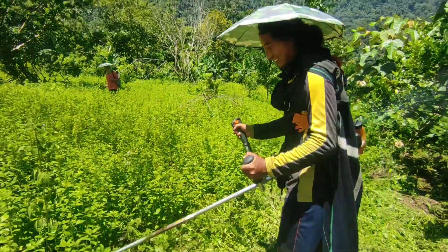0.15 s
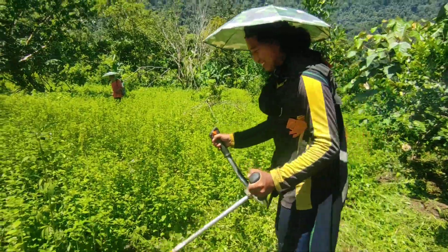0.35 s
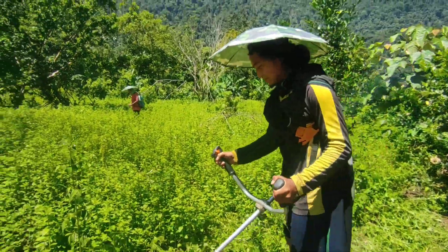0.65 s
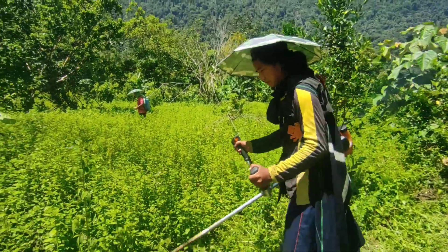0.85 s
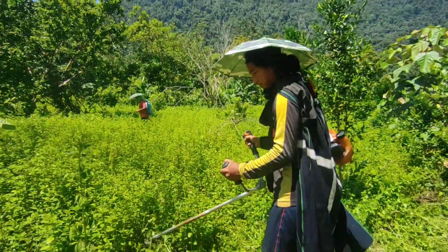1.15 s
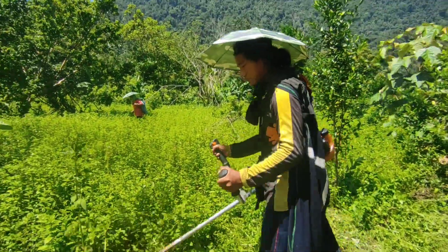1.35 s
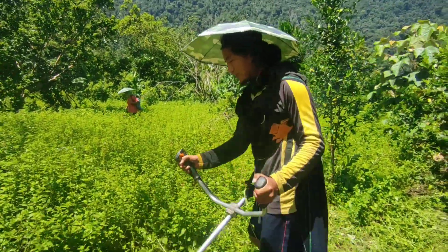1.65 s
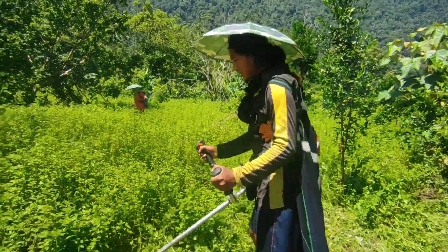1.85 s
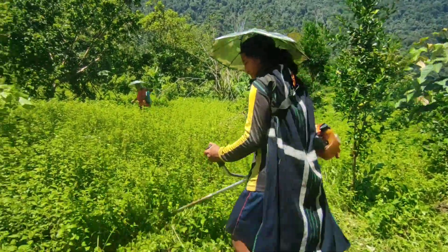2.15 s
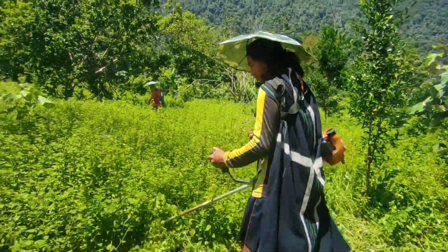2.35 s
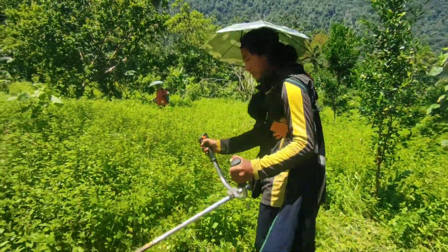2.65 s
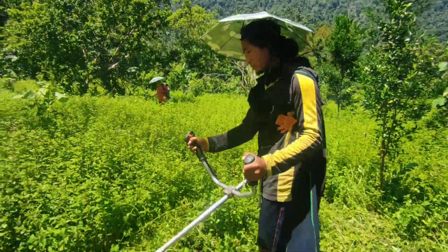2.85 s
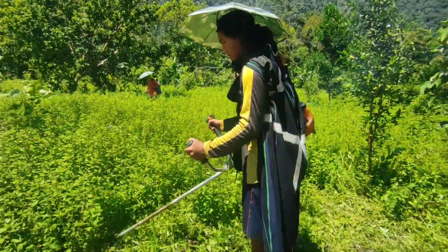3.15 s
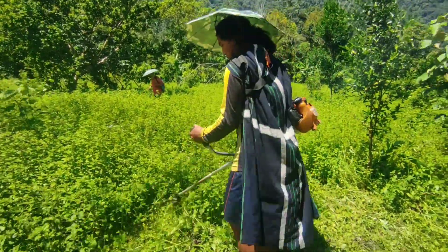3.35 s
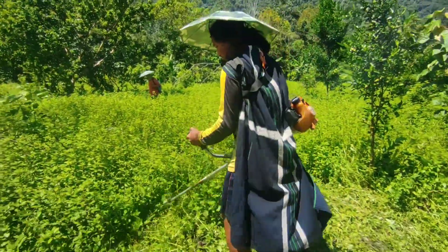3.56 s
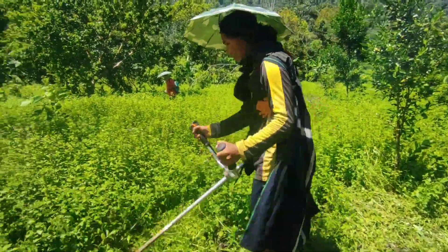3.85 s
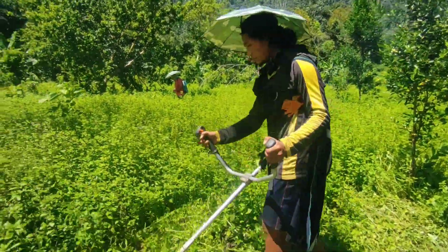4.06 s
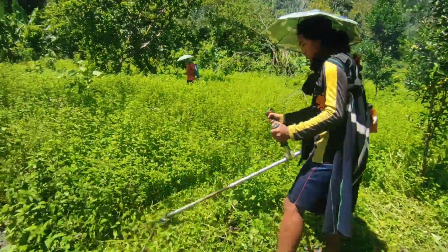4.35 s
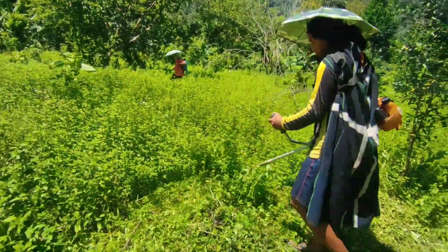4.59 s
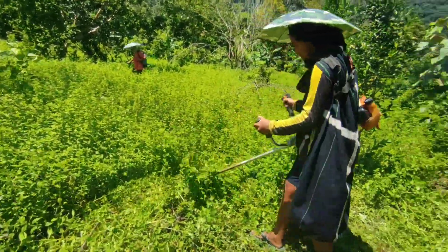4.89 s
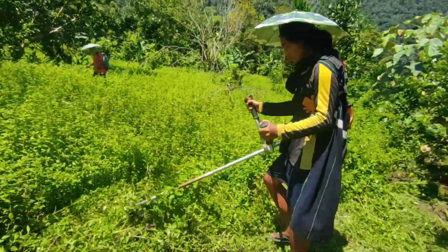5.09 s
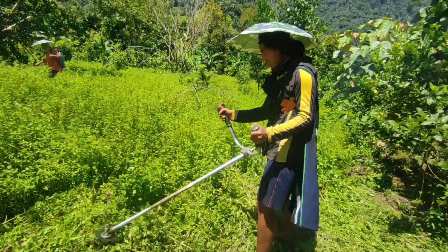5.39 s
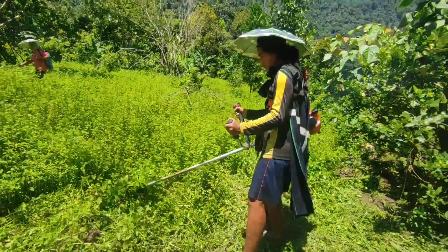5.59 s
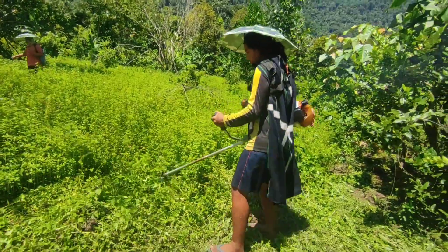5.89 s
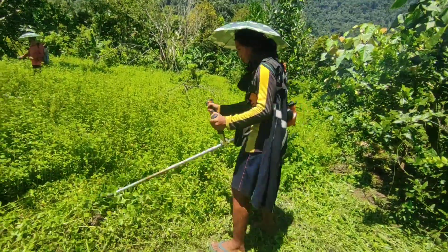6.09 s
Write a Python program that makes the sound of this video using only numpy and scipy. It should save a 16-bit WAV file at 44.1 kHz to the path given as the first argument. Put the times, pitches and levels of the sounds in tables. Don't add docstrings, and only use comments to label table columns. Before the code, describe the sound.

Steady high-revving petrol trimmer outdoors, a buzzing, fluttering drone that swells as it swings, with bright leafy hiss and short gusts on the microphone.

```python
import sys
import numpy as np
from scipy import signal
from scipy.fft import rfft, irfft, next_fast_len
from scipy.io import wavfile
from scipy.ndimage import uniform_filter1d

SR = 44100
rng = np.random.default_rng(int(sys.argv[2]) if len(sys.argv) > 2 else 0)


def output_pcm(signal):
    pcm = np.clip(np.atleast_2d(signal).T, -1, 1) * 32767
    wavfile.write(sys.argv[1], SR, np.round(pcm).astype(np.int16))


def field_ratio(decibels):
    return 10 ** (np.asarray(decibels, dtype=float) / 20)


N = 274743

# (multiple of firing rate [1], level at mean facing [dB], share of swing [dB/dB],
# share of shading [dB/dB], share lost in a cut firing [0-1], left-right spread [dB/dB])
EXHAUST_ORDERS = [(1, -30, 1.37, 0.99, 0.28, 2.4), (2, -19.5, 1.2, -0.15, 0.78, 1.2),
                  (3, -18, 0.94, 0.96, 0.16, 1.95), (4, -18, 1.23, 0.083, 0.03, 2.1),
                  (5, -22, 0.59, 0.25, 0.78, 1.1), (6, -19, 0.54, -0.27, 0.52, 0.86),
                  (7, -22.5, 0.59, 0.64, 0.84, 0.42), (8, -41, 0.28, 0.06, 1, .9)]
SILENCER_DELAY_TURNS = [.3, 0, 0, .064, .15, .2175, .257, .286]
SPARK_RETARD = [(-5, 0.014), (-2.5, 0.12), (-1.05, 0.35), (-1.22, 0.33), (2, 0.012), (3.5, 0)]
# (run start [s], time between cuts [s])
CUT_RUNS = [(0.044, 0.035), (.229, .024), (0.3, 0.04), (0.411, 0.026), (0.669, 0.031), (1.183, 0.028),
            (1.307, 0.034), (1.525, 0.027), (1.633, 0.03), (1.803, 0.032), (1.945, 0.025), (2.162, 0.037),
            (2.224, 0.026), (2.296, .0365), (2.543, .033), (2.778, .029), (2.893, 0.04), (3.159, .034),
            (3.288, .0222), (3.49, 0.032), (3.728, 0.024), (4.011, 0.028), (4.42, .036), (4.565, 0.024),
            (4.761, 0.037), (4.871, 0.032), (5.161, 0.04), (5.532, 0.034), (5.793, .0375), (6.161, 0.025)]
# (middle [s], half length [s], sag [Hz])
BITES = [(0.0, .04, 16), (.5, 0.059, 1.9), (1.02, 0.051, 7.8), (1.56, 0.065, 2.85), (1.72, 0.049, 2.22),
         (2.1, 0.071, 2.74), (2.65, 0.084, 2.92), (3.05, 0.046, 2.39), (3.33, 0.088, 2.94),
         (4.0, .12, 4.08), (4.42, 0.049, 2), (5.57, 0.041, 4.1), (6.22, 0.092, 2.9)]
# (time [s], facing level [dB], body shading of low odd orders [dB],
# ground echo cancelling order 4 [dB])
SWING = [(0.0, -22, -8, -14), (0.31, -18.5, -2, -23), (0.55, -20, -4.5, -23), (0.9, -20.5, -5.5, -17),
         (1.35, -17, -3.5, -15.5), (1.75, -20.5, -6, -16), (2.05, -19, -4, -11), (2.36, -15.5, -2.5, -21),
         (2.85, -20.5, -6, -24), (3.2, -20, -4, -14), (3.57, -15, -3, -16), (3.8, -16, -2, -15),
         (4.1, -21.5, -7, -27), (4.4, -20, -9.5, -19), (4.82, -15.5, -2.5, -23), (5.45, -20.5, -11, -13),
         (6.04, -14.5, -9, -10), (6.23, -20.5, -10.5, -12)]
# (centre [Hz], width [Hz], share removed [1])
SILENCER_HOLLOWS = [(561, 90, 1.1), (822, 80, 1.1)]
# (frequency [Hz], level [dB])
SHAFT_TONES = [
    (184, -58),
    (368, -41.5),
]
# (frequency [Hz], density [dB/Hz])
CASING_SPECTRUM = [(150, -30), (290, -17.5), (400, -7.5), (560, -21), (810, -16), (1000, -5.5), (1300, 3.5),
                   (1700, -3), (2200, -5.5), (3000, -3), (3600, -4.5), (4100, -2), (4700, -12), (5500, -65)]
SHROUD_SPECTRUM = [(3800, -11.5), (4600, -6), (5500, -3.5), (6500, -6), (7200, -1.5), (8000, -14)]
WEEDS_SPECTRUM = [(6000, -4), (7000, -9), (7800, 0), (8800, -0.5), (10000, -6)]
FAN_SPECTRUM = [(7500, -13), (8800, -3), (9800, 3), (10600, -1), (11500, 3), (12500, -1.5), (13400, -9),
                (14400, -13), (15500, -26)]
# (frequency [Hz], correlation [-1 to 1])
STEREO_LIKENESS = [(150, 1), (400, 1), (1300, -0.4), (2200, 0.14), (3200, -0.41), (6000, 0.19),
                   (14000, -0.07)]
# (frequency [Hz], left over right [dB])
STEREO_TILT = [(60, 3.0), (110, -3), (200, 27), (370, -0.5), (690, 40), (1260, -3.5), (2320, 1), (4270, 2),
               (7850, -4), (14400, 3.5)]
# (centre [Hz], width [Hz], level [dB])
BLADE_RINGS = [(7700, 100, -16.5), (9630, 290, -22), (10090, 200, -12), (11670, 290, -9.5)]
# (time [s], level [dB])
CUTTING_LOAD = [(0.0, -16), (0.3, -20), (0.62, -17), (1.46, -19.5), (1.96, -17), (2.05, -19.5),
                (2.15, -16.5), (2.3, -24.5), (2.51, -18.5), (3.1, -18.5), (3.65, -20), (3.9, -18.5),
                (4.22, -18), (4.44, -19), (4.75, -21.5), (5.15, -19), (5.75, -19), (5.9, -19.5)]
# (middle [s], half length [s], loss [dB])
SHROUD_DIPS = [(.35, .12, 2.5), (1.3, 0.12, 1.5), (2.17, 0.051, 6), (2.51, 0.073, 4.5), (3.42, 0.082, 20),
               (3.7, 0.093, 21), (4.44, .05, 8), (5.19, .03, 8), (5.94, .12, 21)]
# (middle [s], half length [s], level [dB])
WIND_PUFFS = [(.97, 0.033, -30), (1.917, 0.038, -45), (2.2, 0.034, -36), (2.691, 0.069, -39),
              (3.054, 0.037, -28), (3.15, 0.028, -41), (3.25, .04, -39), (3.48, .09, -35),
              (3.68, 0.092, -46), (3.903, 0.068, -32), (4.118, 0.038, -27), (4.426, 0.036, -50),
              (5.17, 0.078, -39), (5.56, 0.066, -38)]
# (start [s], end [s], strength [0-1])
HARD_GUSTS = [(0.953, 1.002, 0.61), (2.617, 2.656, 0.73), (2.996, 3.088, 1), (3.886, 3.911, 0.69),
              (3.93, 4.029, 0.35), (4.1, 4.128, 0.82), (5.5, 5.535, 0.48)]
# (frequency [Hz], limit re mean band power [dB])
GUARD_LIMIT = [(1800, -24), (2600, -6.5), (3500, -1), (5200, -1), (6500, -2), (7800, -9), (9000, -15),
               (12300, -13), (13400, -4.5), (14300, 2), (15500, 6.5)]


def rms_one(x):
    return x / np.sqrt(np.mean(x ** 2) + 1e-20)


def in_time(rows):
    time_s, *columns = np.transpose(rows)
    return [np.interp(np.arange(N) / SR, time_s, column) for column in columns]


def at_hz(points, hz):
    point_hz, value = np.transpose(points)
    return np.interp(np.log(hz), np.log(point_hz), value)


def bumps(rows, order=2):
    t = np.arange(N) / SR
    return sum(height * np.exp(-((t - middle) / half) ** order) for middle, half, height in rows)


def drift(rate_hz):
    r = np.exp(-80 * np.pi * rate_hz / SR)
    white = rng.standard_normal(N // 40 + 2002)
    slow = signal.lfilter([1], [1, -2 * r, r * r], white)[2000:]
    return np.interp(np.arange(N) / 40, np.arange(len(slow)), rms_one(slow))


def cut_times():
    ends = [start for start, _ in CUT_RUNS[1:]] + [N / SR]
    runs = [np.arange(start, end - 3 * step / 4, step) for (start, step), end in zip(CUT_RUNS, ends)]
    return np.concatenate(runs)


def at_cuts(shape, sizes):
    turns = np.arange(-1200, 1201) * 228 / SR
    cuts = (cut_times() * SR).astype(int)
    marks = np.zeros(N)
    marks[cuts] = sizes[:len(cuts)]
    return signal.oaconvolve(marks, shape(turns), "same")


def exhaust(gap, retard):
    sag_hz = bumps(BITES)
    firing_hz = 228.52 - sag_hz + 0.496 * drift(3.0)
    facing_db, shade_db, echo_db = in_time(SWING)
    swing_db = facing_db + 19.0
    pan_db = 2.5 - 0.28 * swing_db
    crank = 2 * np.pi * np.cumsum(firing_hz) / SR - retard + 0.0076 * drift(63)
    right_lag_ms = 0.042
    half_lag_rad = np.pi * firing_hz * right_lag_ms / 1000
    low_db = 0.5 * drift(47)
    high_db = 0.5 * drift(42) - 0.3 * sag_hz
    echo_db = echo_db + 0.61 * drift(2.9)
    out = np.zeros((2, N))
    for order, delay_turns in zip(EXHAUST_ORDERS, SILENCER_DELAY_TURNS):
        k, level_db, swing_share, shade_share, lost, spread = order
        path_db = echo_db if k == 4 else low_db if k < 4 else high_db
        gain_db = level_db + swing_share * swing_db + shade_share * shade_db + 4.0 + path_db
        gain = field_ratio(gain_db) * (1 - lost * gap)
        phase = k * (crank - 2 * np.pi * delay_turns)
        side = field_ratio(spread * pan_db / 2)
        out[0] += gain * side * np.cos(phase + k * half_lag_rad)
        out[1] += gain / side * np.cos(phase - k * half_lag_rad)
    return out


def silencer(x):
    open_share = 1 + 0.06 * in_time(SWING)[1]
    for hz, width_hz, share in SILENCER_HOLLOWS:
        band = signal.lfilter(*signal.iirpeak(hz, hz / width_hz, SR), x)
        x = x - np.clip(share * open_share, 0, 1) * band
    return x


def shaft():
    t = np.arange(N) / SR
    out = 0
    for hz, level_db in SHAFT_TONES:
        gain = field_ratio(level_db + 5.0 * drift(2.2))
        out = out + gain * np.sin(2 * np.pi * hz * t + drift(4.6))
    return out


def stereo_noise(spectrum):
    size = next_fast_len(N)
    hz = np.arange(1, size // 2 + 2) * SR / size
    mid, side = rfft(rng.standard_normal((2, size)))
    alike = np.clip(at_hz(STEREO_LIKENESS, hz), -1, 1)
    pair = np.sqrt(1 + alike) * mid + np.sqrt(1 - alike) * side * [[1], [-1]]
    inside = (hz > spectrum[0][0]) & (hz < spectrum[-1][0])
    balance_db = at_hz(STEREO_TILT, hz) * np.array([[0.5], [-0.5]])
    gain = field_ratio(at_hz(spectrum, hz) + balance_db) * inside
    return rms_one(irfft(pair * gain, size)[:, :N])


def blade():
    out = 0
    for hz, width_hz, level_db in BLADE_RINGS:
        r = np.exp(-1.5 * np.pi * width_hz / SR)
        poles = [1, -2 * r * np.cos(2 * np.pi * hz / SR), r * r]
        ring = signal.lfilter([1], np.convolve(poles, poles), rng.standard_normal((2, N)))
        out = out + field_ratio(level_db + 3.6 * drift(9.8)) * rms_one(ring)
    return out


def hiss(puff):
    fan_db, = in_time(CUTTING_LOAD)
    load_db = fan_db + 18.5
    dip_db = bumps(SHROUD_DIPS, order=4)
    shared = drift(11)
    casing_db = -20.0 + 0.1 * load_db + 0.3 * drift(3.5) - 0.045 * bumps(SHROUD_DIPS)
    casing_db = casing_db + 2.0 * puff + 0.3 * shared + 0.87 * drift(33)
    shroud_db = -26.0 + 0.033 * load_db - dip_db + 1.2 * shared + 0.68 * drift(23)
    weeds_db = -23.5 + 1.44 * load_db - 0.18 * dip_db + 0.9 * shared + 2.0 * drift(15)
    blow_db = fan_db + 2.0 + 1.9 * puff + 1.1 * shared + 0.55 * drift(22)
    casing = field_ratio(casing_db) * stereo_noise(CASING_SPECTRUM)
    shroud = field_ratio(shroud_db) * stereo_noise(SHROUD_SPECTRUM)
    weeds = field_ratio(weeds_db) * stereo_noise(WEEDS_SPECTRUM)
    fan = field_ratio(blow_db) * stereo_noise(FAN_SPECTRUM)
    tips = 1 + 0.04 * np.sin(2 * np.pi * SHAFT_TONES[1][0] * np.arange(N) / SR)
    return casing + shroud + tips * (weeds + fan) + field_ratio(fan_db - 1.5) * blade()


def filtered(x, order, edge_hz, kind="low"):
    return signal.sosfilt(signal.butter(order, edge_hz, kind, fs=SR, output="sos"), x)


def wind():
    puffs = [(middle, half, field_ratio(level_db)) for middle, half, level_db in WIND_PUFFS]
    blowing = field_ratio(-46.5) + bumps(puffs)
    low_white, high_white = rng.standard_normal((2, 2, N))
    low = filtered(filtered(low_white, 1, [18, 130], "band"), 1, 500)
    rasp = filtered(high_white, 2, [1750, 2450], "band")
    flap = filtered(high_white, 2, [200, 1600], "band")
    buffet_db = -1.5 + 2.1 * drift(20) + np.array([[2.1], [-2.1]])
    buffet = blowing * field_ratio(buffet_db) * rms_one(low)
    t = np.arange(N) / SR
    gust, ramp_s = 0, 0.0033
    for start, end, strength in HARD_GUSTS:
        gust = gust + strength * np.clip(np.minimum(t - start, end - t) / ramp_s + 0.5, 0, 1)
    tearing = field_ratio(-21.8) * rms_one(rasp) + field_ratio(-23.0 + 4.8 * drift(80)) * rms_one(flap)
    return buffet + gust * tearing, gust


def scene():
    depth = np.clip(1 + 0.25 * rng.standard_normal(size=400), 0.5, 1.2)
    gap = np.clip(at_cuts(lambda turns: np.exp(-(turns / 0.63) ** 2), depth), 0, 1.1)
    puff = at_cuts(lambda turns: np.exp(-((turns + 0.57) / 2.44) ** 2), depth)
    retard = at_cuts(lambda turns: np.interp(turns, *np.transpose(SPARK_RETARD)), depth)
    air, gust = wind()
    drone = silencer(exhaust(gap, retard)) + shaft()
    return field_ratio(-9.5 * gust) * drone + silencer(hiss(puff)) + air


def noise_guard(x, waver_db):
    hz, _, cells = signal.stft(x, SR, nperseg=1024, noverlap=512)
    power = uniform_filter1d(np.sum(np.abs(cells) ** 2, axis=0), size=4, axis=0)
    held = uniform_filter1d(power, size=4, axis=1)
    guarded = hz > GUARD_LIMIT[0][0]
    blocks = uniform_filter1d(rng.standard_normal(held.shape), size=2, axis=1)
    waver = blocks[np.arange(len(hz)) // 7][:, np.arange(held.shape[1]) // 3]
    waver = waver_db * rms_one(waver) * guarded[:, None]
    limit = field_ratio(2 * at_hz(GUARD_LIMIT, hz + 1)) * power.mean(axis=1) * guarded
    shut = held < limit[:, None] * field_ratio(2 * waver)
    cells = cells * field_ratio(-0.55 * waver - 0.32)
    return signal.istft(cells * ~shut, nperseg=1024, noverlap=512)[1][:, :N]


def low_pass(x):
    return signal.sosfilt(signal.butter(12, 15030, fs=SR, output="sos"), x)


def record(dry):
    rounded = dry / (1 + (dry / 0.98) ** 6) ** (1 / 6)
    return low_pass(noise_guard(rounded, waver_db=3.5))


dry = scene()
out = record(dry)
output_pcm(out)
```